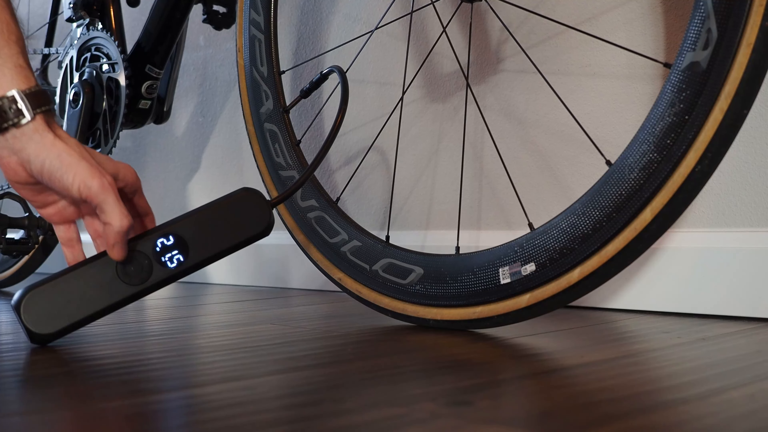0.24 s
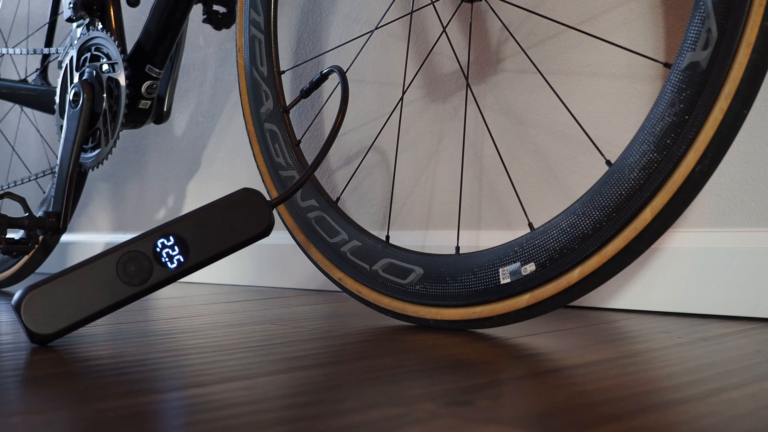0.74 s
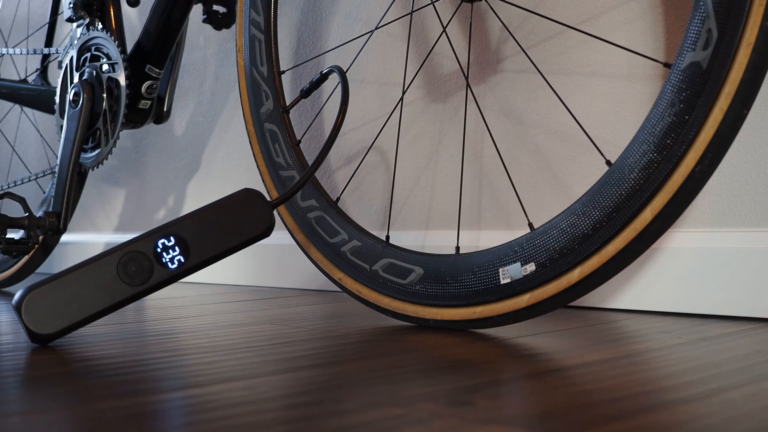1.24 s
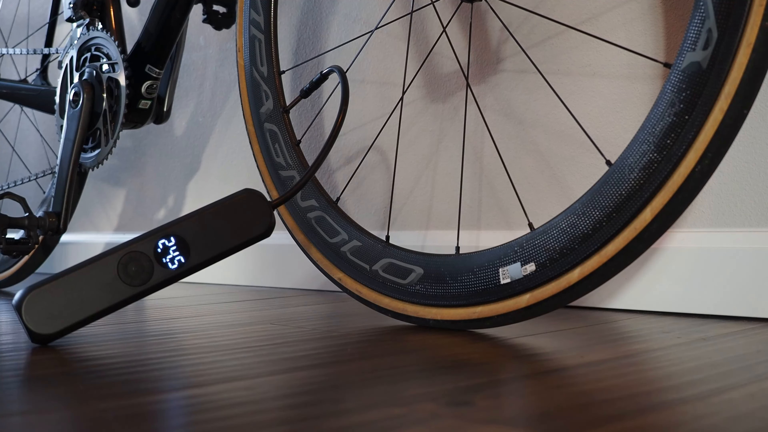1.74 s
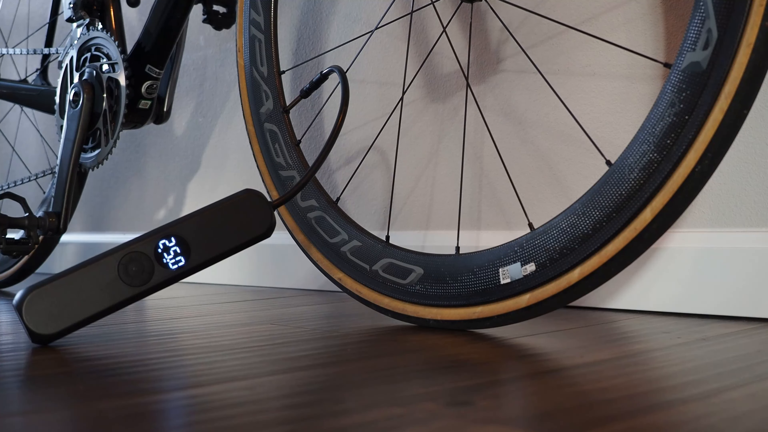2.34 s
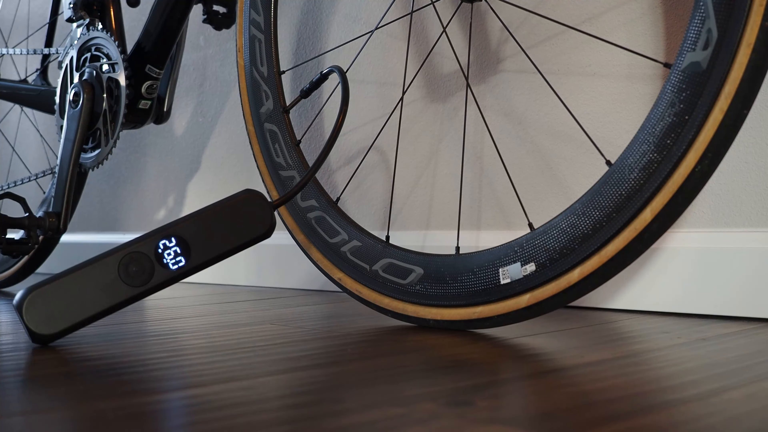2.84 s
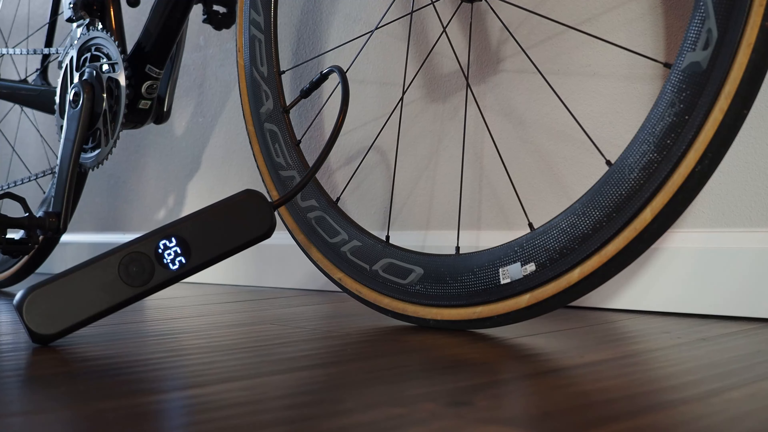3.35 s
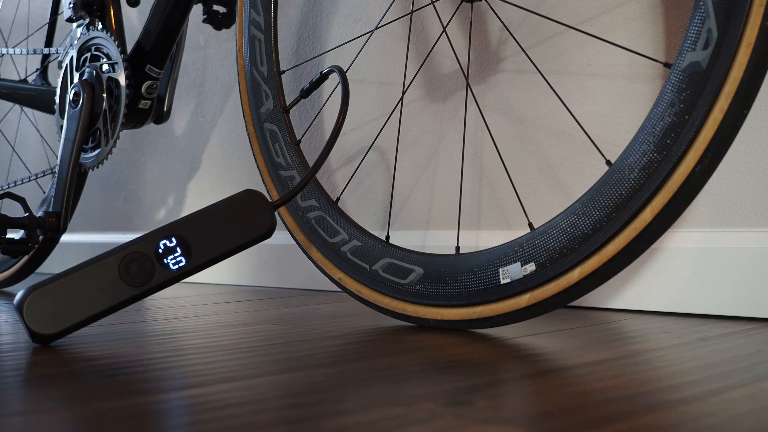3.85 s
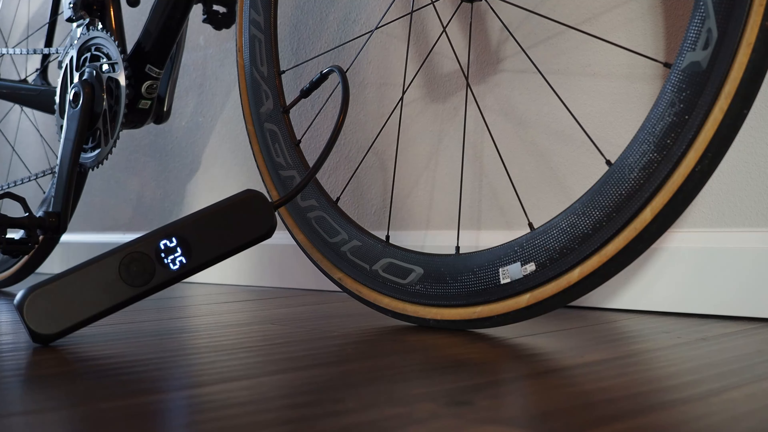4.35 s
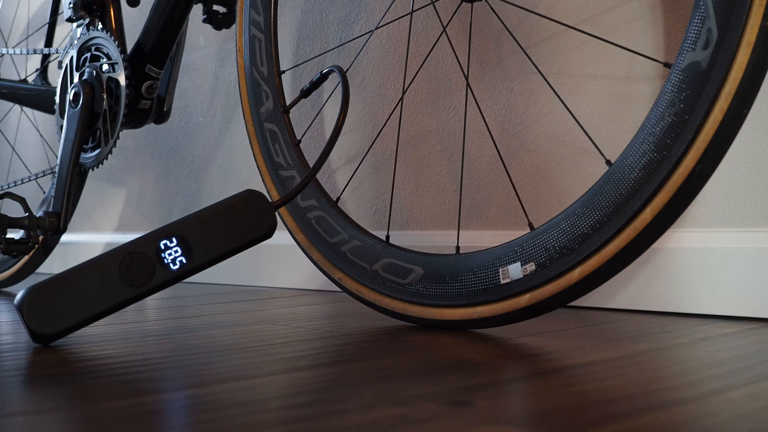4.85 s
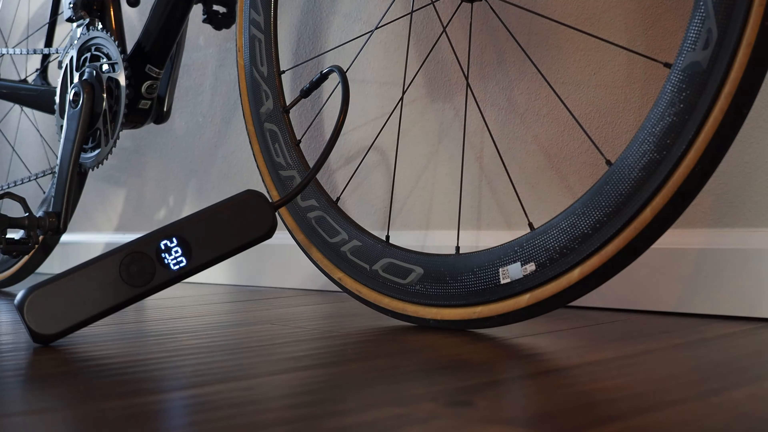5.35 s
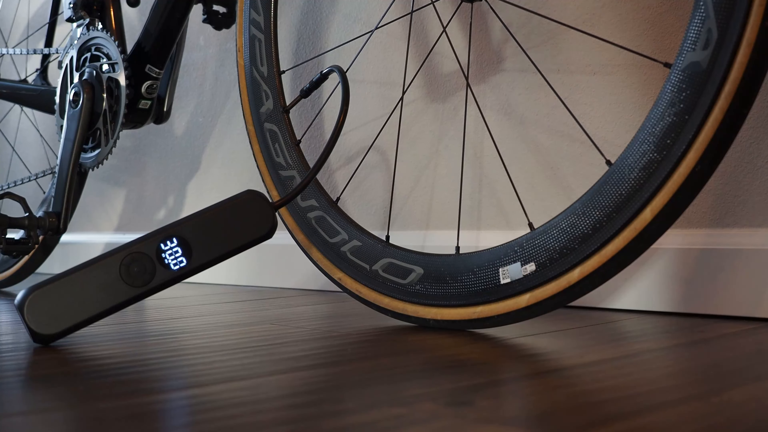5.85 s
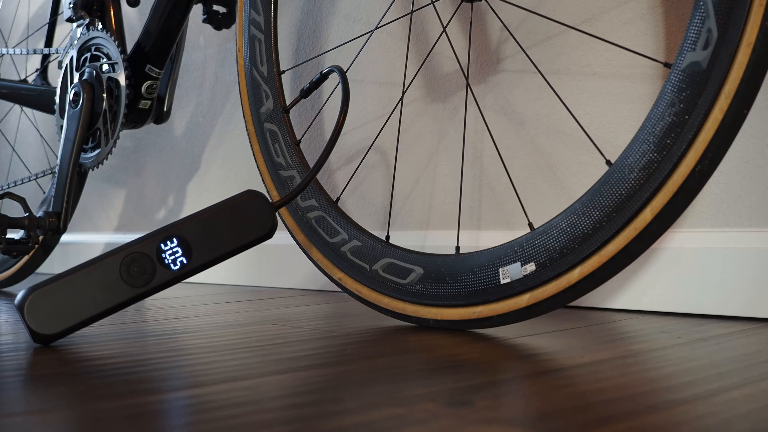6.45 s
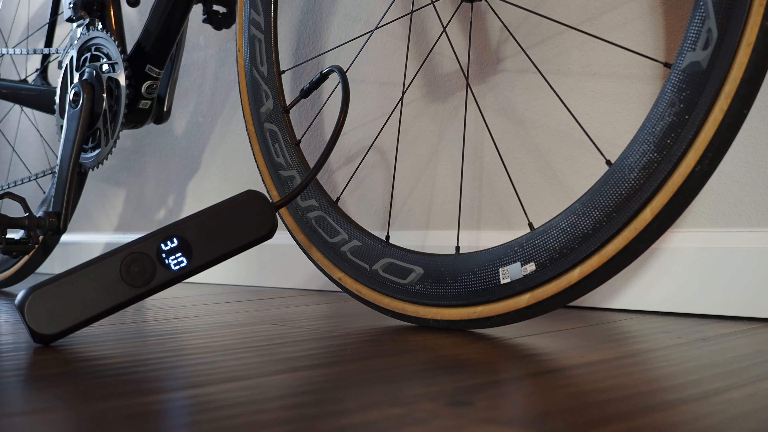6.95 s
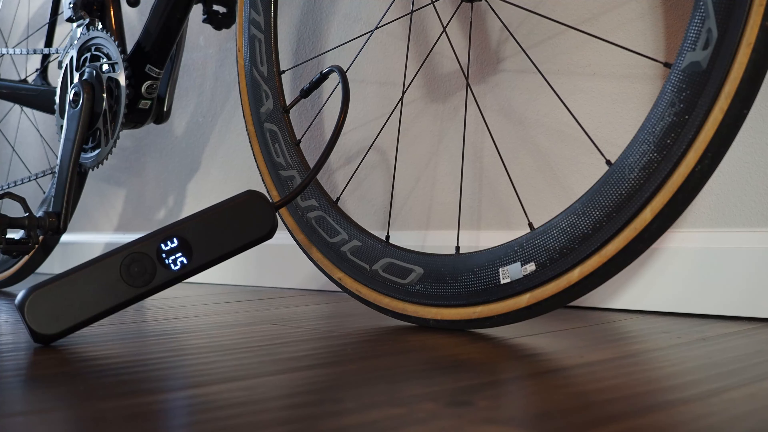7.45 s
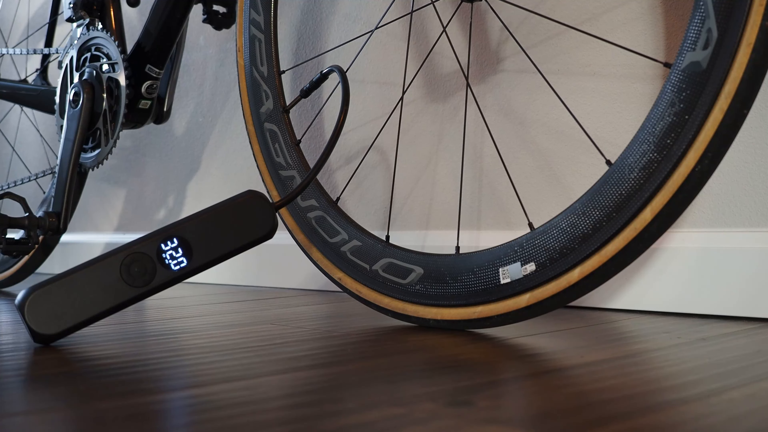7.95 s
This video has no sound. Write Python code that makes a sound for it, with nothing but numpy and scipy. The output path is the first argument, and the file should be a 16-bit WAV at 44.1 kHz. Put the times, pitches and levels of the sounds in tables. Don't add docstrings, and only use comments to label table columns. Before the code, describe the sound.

A small electric air pump whines steadily, its nasal tone pulsing so fast it buzzes, with rattle, valve chatter and hiss while filling a tyre.

```python
import sys
import numpy as np
from scipy import signal
from scipy.fft import rfft, irfft, next_fast_len
from scipy.io import wavfile
from scipy.ndimage import uniform_filter1d

SR = 44100
rng = np.random.default_rng(int(sys.argv[2]) if len(sys.argv) > 2 else 0)


def linear_from_db(decibels):
    return 10 ** (np.asarray(decibels, float) / 20)


def master_out(mix):
    frames = np.transpose(np.atleast_2d(mix))
    ceiling = np.clip(frames, -1, 1)
    pcm = np.round(ceiling * 32767).astype(np.int16)
    wavfile.write(sys.argv[1], SR, pcm)


N = 361619

# (time [s], speed [turns/s])
CRANK_SPEED = [(0, 39.585), (.591, 39.585), (.595, 39.226), (1.32, 38.987), (2.15, 38.186), (2.163, 38.572),
               (3.232, 38.623), (3.48, 39.238), (3.519, 38.539), (4.189, 38.769), (4.319, 38.563),
               (5.6, 38.395), (5.762, 38.776), (5.802, 38.435), (7, 38.52), (7.251, 38.812), (7.266, 38.37),
               (8.2, 38.392)]
# (angle [turns], mesh tone [Hz], load [dB])
TOOTH_MESH = [(-.5, 1740, -26), (-.3, 1850, -20), (-.16, 1855, -14), (-.1, 1820, -9.5), (-.052, 1785, -3.6),
              (-.026, 1760, -1.2), (0, 1734, 0), (.026, 1705, -1.3), (.052, 1660, -3.8), (.08, 1600, -7),
              (.105, 1560, -11.5), (.14, 1500, -18), (.2, 1600, -24), (.5, 1740, -26)]
# (multiple [1], level [dB])
MESH_OVERTONES = [(2, -31.5), (3, -34), (4, -38), (5, -60), (6, -51)]
# (centre [Hz], width [Hz], gain [dB])
GEARBOX_RINGS = [(3150, 350, 12), (5480, 600, 15), (7500, 500, 5), (9340, 400, 5)]
# (frequency [Hz], density [dB/Hz])
SHELL_SPECTRUM = [(25, -34), (60, -33), (110, -37), (270, -20), (360, -35), (580, -16), (750, -17.5),
                  (1100, -8.5), (1260, -3), (1450, 5.5), (1650, -1.5), (1850, 7), (2000, -7.5), (2500, -25)]
# (frequency [Hz], density [dB/Hz])
VALVE_SPECTRUM = [(200, -77), (400, -24), (620, -2.5), (800, -21), (1150, -8), (1600, 2.5), (2200, -5.5),
                  (3200, -13), (4500, -8.5), (5400, -31), (6500, -28), (9500, -24), (13500, -34)]
# (frequency [Hz], density [dB/Hz])
RATTLE_SPECTRUM = [(1180, -22.5), (2000, -9), (2170, -3.5), (2420, -7.5), (2610, -6), (2800, -10.5),
                   (3240, -1), (3530, -11), (4110, -10.5), (4510, -7.5), (4900, -10.5), (5400, -9),
                   (6400, -36.5), (8320, -53), (14100, -120)]
# (frequency [Hz], density [dB/Hz])
AIR_SPECTRUM = [(3530, -66), (6000, -1), (6630, -12.5), (7480, 2.5), (7870, 0.5), (8670, -0.5), (9390, 0.5),
                (10500, -11), (11000, 1.5), (11500, -0.5), (13100, -3), (15000, -9), (15600, -15.5)]
# (frequency [Hz], density [dB/Hz])
REED_SPECTRUM = [(14000, -34), (14700, 0), (15200, 10), (15600, 8), (15900, -20)]
# (centre [Hz], width [Hz], gain [dB])
SHELL_RINGS = [(587, 35, -19.5), (710, 78, 6), (962, 230, 6.5), (2720, 230, 1.5), (2940, 140, 2.5),
               (3760, 120, 7.5), (4400, 350, 3), (7660, 180, 2), (8060, 100, 3.5), (9280, 200, 3),
               (10300, 60, 7), (12200, 90, 1.5), (12300, 60, 2), (12550, 60, 9)]
# (multiple of turn rate [1], gain [dB])
FREE_HUM = [(2, 10.5), (3, -3), (4, 6), (5, 8), (8, -10), (10, -9), (11, 4), (12, 4.5), (13, -6), (14, -5),
            (15, -10), (18, 7.5), (25, -8), (27, 6)]
# (multiple of turn rate [1], gain [dB])
HELD_HUM = [(2, 6), (3, -5), (6, 6), (7, 8), (9, -5), (10, 4), (13, 8), (17, 10), (19, 12), (21, 11),
            (24, 10), (26, 14), (28, 12), (30, 6)]
# (time [s], peak level [dB], floor tone [Hz])
FOOTFALLS = [(1.937, -47, 33), (2.0, -44, 36), (2.824, -40, 35.0), (2.928, -44, 33), (3.073, -50, 29.6),
             (3.471, -48, 51.1), (3.72, -48, 115), (4.03, -37, 45.8), (4.109, -50, 50.0),
             (4.804, -49, 37.7), (4.87, -50, 33), (6.04, -48, 64.6), (7.094, -49, 45.8), (7.621, -41, 50)]
# (frequency [Hz], likeness [1])
LIKENESS = [(120, 0.84), (200, 0.9), (450, 0.98), (850, 0.89), (1900, 0.86), (2200, 0.4), (3200, 0.36),
            (3800, 0.24), (5400, 0.38), (7000, 0.18), (15000, 0.24)]
# (frequency [Hz], left over right [dB])
BALANCE = [(110, 3.5), (250, 3.5), (800, -1.5), (1300, -0.5), (1900, -7), (2400, 1), (3700, 2), (4500, 1),
           (5800, -4), (7500, 1), (9500, -2.5), (13300, -3), (15000, 8)]

T_S = np.arange(N) / SR
SIZE = next_fast_len(N + SR)
HZ = np.maximum(np.arange(SIZE // 2 + 1) * SR / SIZE, 1)
SIDES = np.array([[1], [-1]])


def gear(turns):
    mean_turns_per_s, pitch_follows = 38.6, 0.4
    soft_start, firm_up_s = 0.16, 0.84
    angle, mesh_hz, mesh_load_db = np.transpose(TOOTH_MESH)
    folded = (turns + 0.5) % 1 - 0.5
    pace = uniform_filter1d(np.gradient(turns), size=8000) * SR / mean_turns_per_s
    tone_hz = np.interp(folded, angle, mesh_hz) * pace ** pitch_follows * (1 + 0.00552 * drift(22.56))
    phase = 2 * np.pi * np.cumsum(tone_hz) / SR
    load_db = uniform_filter1d(np.interp(folded, angle, mesh_load_db), size=9)
    load_db = load_db * (1 - soft_start * np.exp(-T_S / firm_up_s))
    tone = linear_from_db(load_db) * np.sin(phase) * linear_from_db([[-1.4], [1.1]])
    overtones = sum(linear_from_db(db) * np.sin(k * phase) for k, db in MESH_OVERTONES)
    overtones = overtones * linear_from_db(0.92 * load_db + 1.3 * drift(31))
    overtones *= linear_from_db(-0.6 * T_S)
    strength = each_turn(turns + 0.5, spread_db=0.53)
    direct = rfft(strength * tone, SIZE) * echoes(wet_db=-15)
    rung = rfft(strength * overtones, SIZE) * linear_from_db(rings_db(GEARBOX_RINGS)) * echoes(wet_db=-6.5)
    return rms_one(irfft(direct + rung, SIZE)[:, :N])


def shell(turns, since, shell_db):
    pressed = 1 - 0.65 * bump(turns, at=0.02, width=0.09)
    noise = shaken(pressed, at_hz(SHELL_SPECTRUM), same=0, since=since, wet_db=-7.5)
    return linear_from_db(shell_db + 8 + 0.89 * drift(13.4)) * noise


def rattle(turns, since, rattle_db, back):
    busy = bump(turns, at=0.02, width=0.065)
    gate = 1 + 0.49 * busy + 0.49 * back
    noise = shaken(gate, at_hz(RATTLE_SPECTRUM), same=0.36 + 0.43 * busy, since=since)
    return linear_from_db(rattle_db + 1.4 + 0.48 * drift(14)) * noise


def valve(turns, since, shell_db):
    knocks = bump(turns, at=0.2994, width=0.03) * each_turn(turns, spread_db=0.7)
    knocks += 0.5 * bump(turns, at=0.17, width=0.036) * each_turn(turns, spread_db=2.0)
    noise = shaken(knocks, at_hz(VALVE_SPECTRUM), same=0.048, since=since, lows_late=1.6, wet_db=-3.0)
    return linear_from_db(shell_db - 2.0) * noise


def air(turns, since, air_db, back):
    top = bump(turns, at=0, width=0.023)
    gate = 1 + 1.9 * top + 0.99 * back
    noise = shaken(gate, at_hz(AIR_SPECTRUM), same=0.019 + 0.26 * top, since=since)
    return linear_from_db(air_db + 0.69 * drift(14)) * noise


def whistle(turns, since, air_db):
    centre_hz, width_hz = 11370, 260
    narrow_db = -15 * np.log10(1 + (2 * (HZ - centre_hz) / width_hz) ** 2)
    blowing = 1 + 1.9 * bump(turns, at=0.72, width=0.041) + 0.73 * bump(turns, at=0.9, width=0.06)
    blowing += 0.3 * bump(turns, at=0.31, width=0.03)
    return linear_from_db(air_db - 3.5 + 1.6 * drift(13)) * shaken(blowing, narrow_db, same=0.075, since=since)


def reed(turns, since, air_db):
    bursts = [(0.21, 0.55), (0.31, 0.37), (0.49, 0.72), (0.82, 0.98)]
    flutter = sum(size * bump(turns, at, width=0.0083) for at, size in bursts)
    return linear_from_db(air_db - 16.5) * shaken(flutter, at_hz(REED_SPECTRUM), same=0.1, since=since)


def hum(turns):
    free_base_db, rise_per_multiple_db, held_base_db = -63, 0.55, -57.5
    let_go_s, build_s = 0.75, 1.26
    thump_turns, thump_scatter = 0.23, 0.3
    t, turns = T_S[::8], turns[::8]
    held = 1 / (1 + np.exp((t - let_go_s) / 0.03))
    free_low = 1 - held
    free_high = linear_from_db(0.14 * (t - 5.0)) / (1 + np.exp((build_s - t) / 0.3))
    free_gain_db, held_gain_db = dict(FREE_HUM), dict(HELD_HUM)
    out = 0
    for k in range(1, 32):
        upper = k > 17
        free_db = free_base_db + rise_per_multiple_db * k + free_gain_db.get(k, 0)
        held_db = held_base_db + held_gain_db.get(k, 0)
        level = held * linear_from_db(held_db) + (free_high if upper else free_low) * linear_from_db(free_db)
        waver = 1 + 0.12 * drift(1.5 + 0.1 * k)[::8]
        offset = (thump_scatter if upper else 1) * rng.random()
        tone = np.sin(2 * np.pi * (k * (turns - thump_turns) + offset))
        out += level * waver * linear_from_db(0.1 * k - 0.6) * tone
    return np.sqrt(2) * signal.resample_poly(out, 8, 1)[:N] * linear_from_db([[0.1], [-0.1]])


def steps():
    out = np.zeros(N)
    for start_s, peak_db, hz in FOOTFALLS:
        age = np.maximum(T_S - start_s, 0) / 0.013
        out += linear_from_db(peak_db + 10.5) * age ** 2 * np.exp(-age) * np.sin(2 * np.pi * hz * (T_S - start_s))
    return out


def rumble():
    band = signal.butter(4, [15, 50], "band", fs=SR, output="sos")
    low = signal.sosfilt(band, rng.standard_normal(N + SR))[SR:]
    return linear_from_db(-58.5 + 2.5 * drift(3)) * rms_one(low)


def shaken(gate, spectrum_db, same, since, lows_late=0.0, wet_db=-4.0):
    same = np.clip(same, 0, 1)
    fresh = rng.standard_normal((2, N))
    repeated = rng.standard_normal((2, SR // 20))[:, since]
    noise = np.sqrt(1 - same) * fresh + np.sqrt(same) * repeated
    colour = linear_from_db(spectrum_db + rings_db(SHELL_RINGS) + SIDES * at_hz(BALANCE) / 2)
    colour = colour * np.exp(-2j * np.pi * lows_late * np.log(HZ))
    stereo = spread(*rfft(gate * noise, SIZE))
    return rms_one(irfft(colour * echoes(wet_db) * stereo, SIZE)[:, :N])


def bump(turns, at, width):
    return np.exp(-0.5 * (((turns - at + 0.5) % 1 - 0.5) / width) ** 2)


def each_turn(turns, spread_db):
    return linear_from_db(spread_db * rng.standard_normal(400))[turns.astype(int)]


def drift(rate_hz):
    r = np.exp(-80 * np.pi * rate_hz / SR)
    slow = signal.lfilter([1], [1, -2 * r, r * r], rng.standard_normal(N // 40 + 2002))[2000:]
    return np.interp(np.arange(N) / 40, np.arange(len(slow)), rms_one(slow))


def rings_db(rings):
    return sum(db / (1 + (2 * (HZ - hz) / width) ** 2) for hz, width, db in rings)


def at_hz(points):
    hz, value = np.transpose(points)
    return np.interp(np.log(HZ), np.log(hz), value)


def spread(mid, side):
    left_leads_s, lead_from_hz = 0.00019, 3500
    alike = np.clip(at_hz(LIKENESS), -1, 1)
    lead = np.exp(1j * np.pi * SIDES * left_leads_s * HZ / (1 + (lead_from_hz / HZ) ** 6))
    return (np.sqrt(1 + alike) * mid + SIDES * np.sqrt(1 - alike) * side) * lead


def echoes(wet_db):
    room_t60_s = 0.27
    t = np.arange(SR // 2) / SR
    tail = rng.standard_normal((2, len(t))) * linear_from_db(-60 * t / room_t60_s) * (t > 0.002)
    tail /= np.sqrt(2 * np.sum(tail ** 2, axis=1, keepdims=True))
    return 1 + linear_from_db(wet_db) * spread(*rfft(tail, SIZE))


def rms_one(x):
    return x / np.sqrt(np.mean(x ** 2) + 1e-20)


def scene():
    even_turns = 1.016 + np.cumsum(np.interp(T_S, *np.transpose(CRANK_SPEED))) / SR
    turns = even_turns + 0.004 * drift(8)
    begins = np.diff(np.floor(turns + 0.3), prepend=0) > 0
    since = np.arange(N) - np.maximum.accumulate(begins * np.arange(N))
    back = bump(turns, at=0.837, width=0.055)

    early = np.exp(-T_S / 2)
    jolt_db = 10 * np.exp(-T_S / 0.0028)
    surge_db = -0.39 * drift(5.3)
    whine_db = -15 + surge_db
    shell_db = -30 - 1.6 * early + surge_db
    rattle_db = -29.5 - 1.5 * early + jolt_db
    air_db = -34.5 + 4 * early + jolt_db

    mix = linear_from_db(whine_db + 0.17) * gear(turns)
    mix += shell(turns, since, shell_db) + rattle(turns, since, rattle_db, back)
    mix += valve(turns, since, shell_db) + air(turns, since, air_db, back)
    mix += whistle(turns, since, air_db) + reed(turns, since, air_db)
    return mix + hum(even_turns) + steps() + rumble()


def top_cut(x):
    return signal.sosfilt(signal.butter(12, 15750, fs=SR, output="sos"), x)


def record(dry):
    mix = np.clip(dry, -1, 1)
    return top_cut(mix)


dry = scene()
out = record(dry)
master_out(out)
```